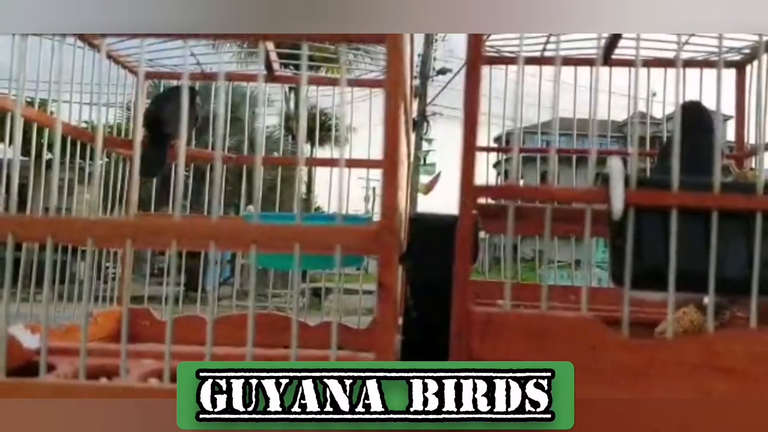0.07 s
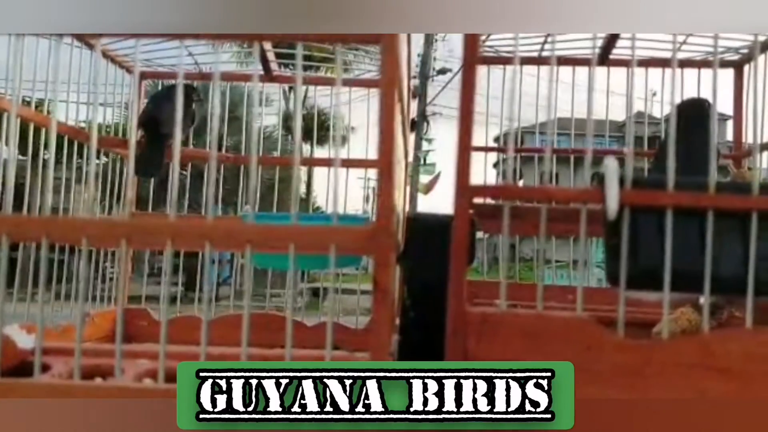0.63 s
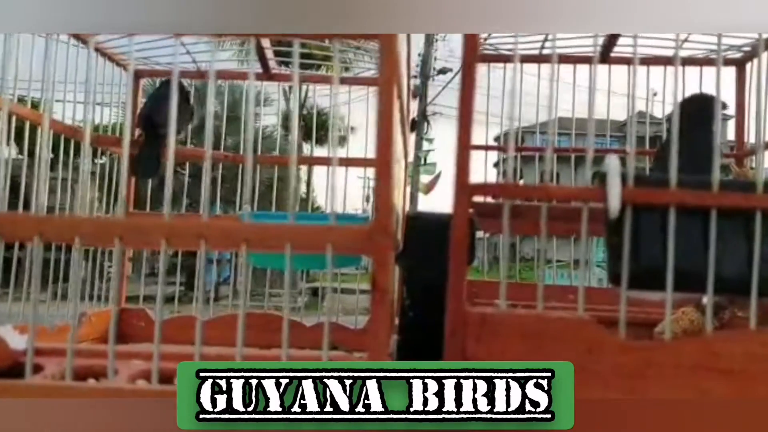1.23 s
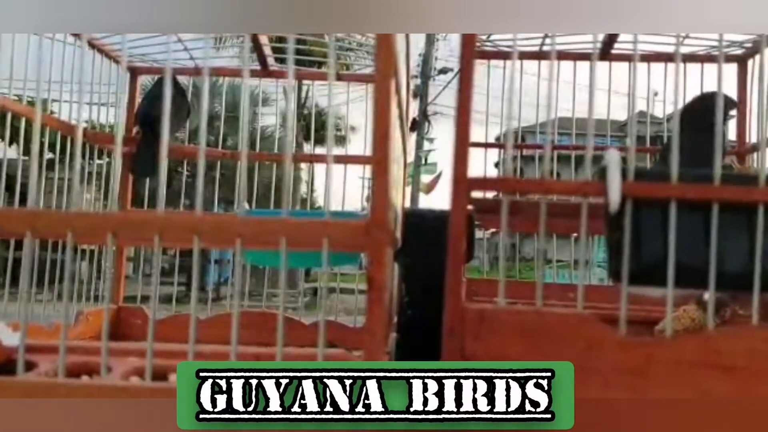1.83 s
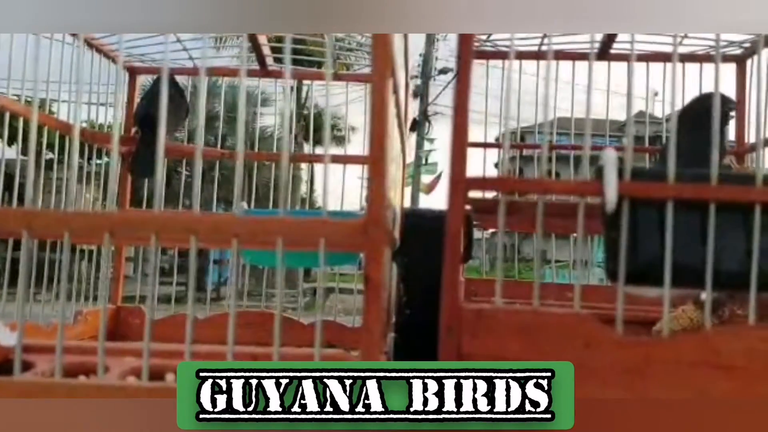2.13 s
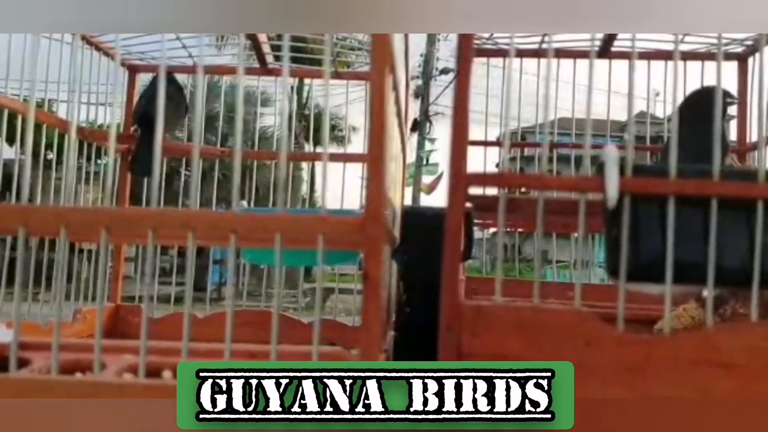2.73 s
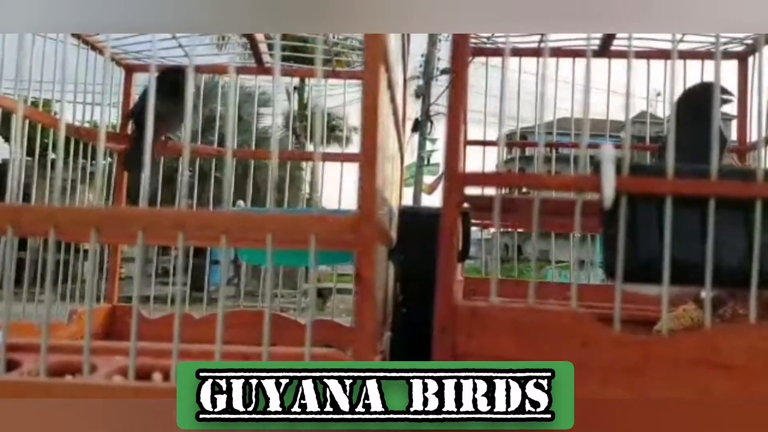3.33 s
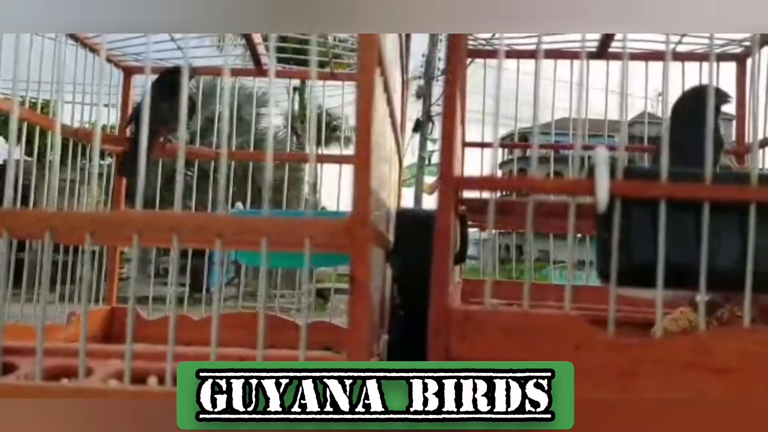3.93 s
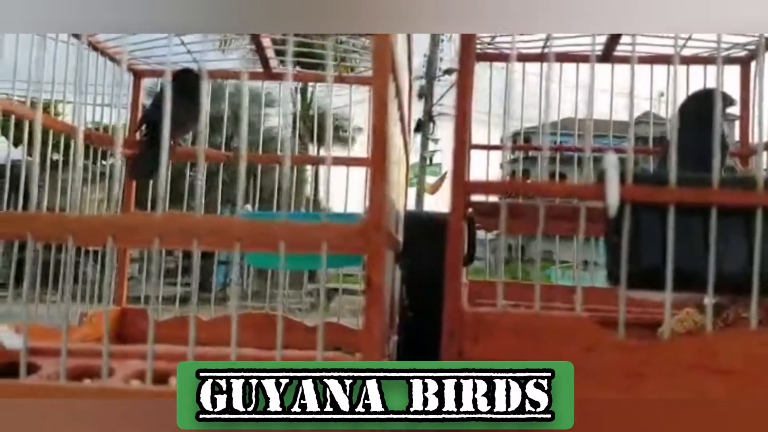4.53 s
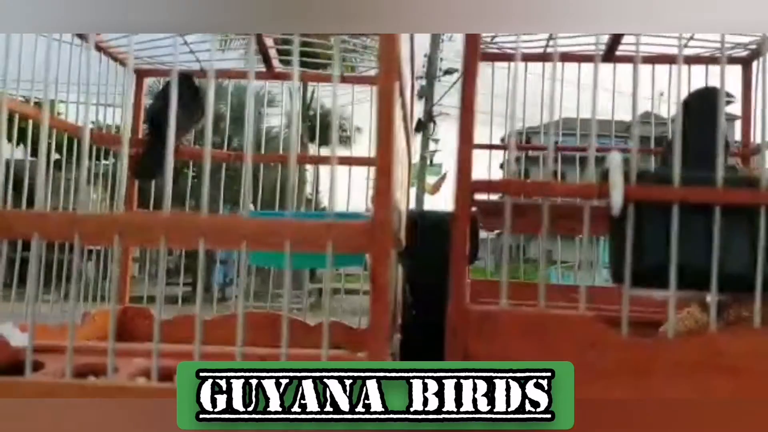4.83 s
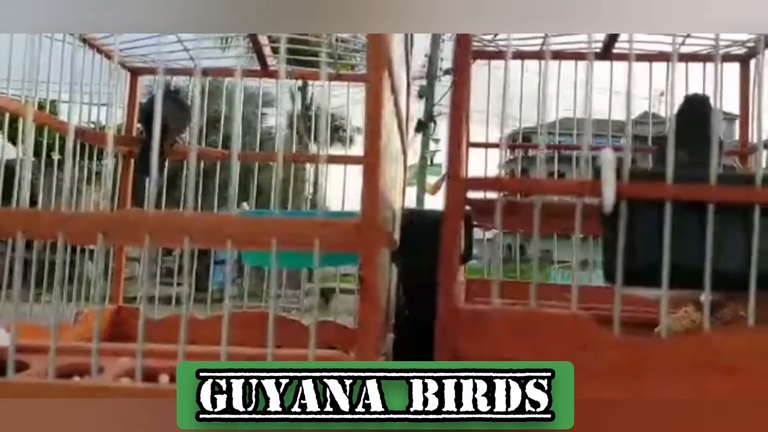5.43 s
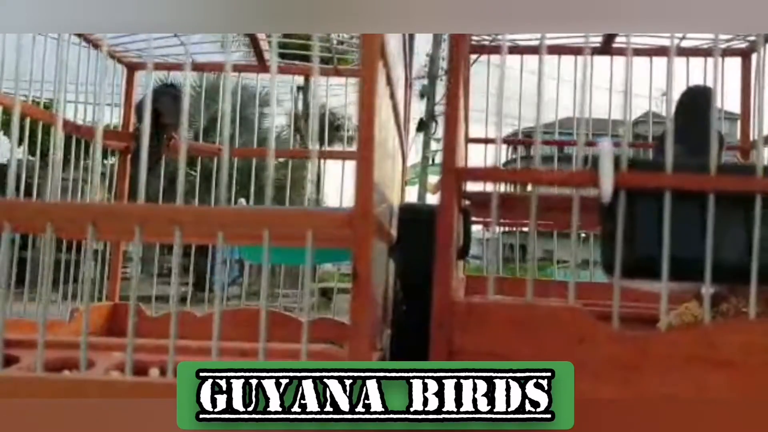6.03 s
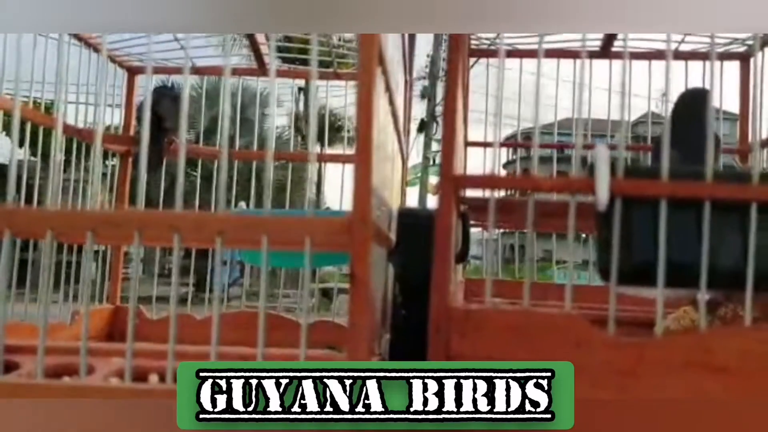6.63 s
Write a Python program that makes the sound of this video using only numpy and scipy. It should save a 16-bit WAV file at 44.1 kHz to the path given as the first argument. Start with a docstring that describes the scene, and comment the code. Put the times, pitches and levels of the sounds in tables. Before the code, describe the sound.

A caged finch sings outdoors, close to the microphone and to the right. Its quick chirps and gliding whistles start softly and grow into rapid phrases. Around the middle come a few low nasal notes, a brief hissing buzz and a short trill, then the whistled phrases resume. Other birds call faintly further off, over the low hum and tyre noise of distant traffic.

```python
"""A caged finch sings outdoors, close by and to the right: quick flicks, gliding whistles, a few
low nasal notes, a hissing buzz and a short trill. Its voice box (the syrinx) makes a tone with
overtones, and its throat and beak boost some pitches more than others. Other birds call further
off, over the low hum, tyre noise and engine drones of distant traffic.
The cage and nearby walls add short echoes."""
import sys
import numpy as np
from scipy import signal
from scipy.fft import rfft, irfft
from scipy.io import wavfile
from scipy.ndimage import uniform_filter1d

SR = 44100
rng = np.random.default_rng(int(sys.argv[2]) if len(sys.argv) > 2 else 0)


def waveform_to_disk(signal):
    """Save audio, clipped to [-1, 1], as 16-bit WAV at the path in sys.argv[1]."""
    frames = np.transpose(np.atleast_2d(signal))
    scaled = np.clip(frames, -1, 1) * 32767
    samples = np.round(scaled).astype(np.int16)
    wavfile.write(sys.argv[1], SR, samples)


N = 294147
TIME = np.arange(N) / SR
FREQS = np.maximum(np.arange(N // 2 + 1) * SR / N, 1)

# Levels in all tables are relative: later steps turn them up or down.
# The overtones of a clear whistle. Each row: multiple of the pitch, level in dB.
WHISTLE_OVERTONES = [(1, 10), (2, -7), (3, -9), (4, -19.5), (5, -32)]
# A whistle is loudest where the throat rings along. Each row: pitch in Hz, gain in dB.
WHISTLE_LOUDNESS = [(2400, -22.5), (2800, -1.5), (3300, 1), (4100, 2.5), (4600, -1.5), (4850, 0),
                    (5200, -10.5), (5600, -22), (6800, -18)]


def from_db(db):
    """Turn decibels into a factor to multiply by."""
    return 10 ** (np.asarray(db) / 20)


def rms_one(x):
    """Scale a signal to an average (rms) level of 1."""
    return x / np.sqrt(np.mean(x ** 2) + 1e-20)


def at_hz(points, hz):
    """Read between the rows of a frequency table, giving each octave equal room."""
    f, value = np.transpose(points)
    return np.interp(np.log(hz), np.log(np.sort(f)), value)


def columns(rows):
    """The columns of a table, in time order."""
    rows = np.array(rows, float)
    return rows[np.argsort(rows[:, 0], kind="stable")].T


def flutter(rate_hz):
    """A random wobble of size about 1, mostly slower than the given rate."""
    return rms_one(irfft(rfft(rng.standard_normal(N)) / (1 + (FREQS / rate_hz) ** 2), N))


def note(start, length, attack_s, release_s):
    """The samples of a note, its progress from 0 to 1, and an envelope that fades it in and out."""
    at = np.flatnonzero((TIME > start) & (TIME < start + length))
    age = TIME[at] - start
    return at, age / length, np.clip(np.minimum(age / attack_s, (length - age) / release_s), 0, 1)


def outdoor_noise(spectrum):
    """Noise from all around, nearly the same on both sides only in the bass."""
    # Each row: frequency in Hz, how alike left and right are (1 the same, -1 opposite).
    likeness = [(60, 0.97), (160, 0.94), (350, 0.67), (700, 0.0032), (1400, -0.63), (2800, 0.52),
                (6000, -0.045)]
    mid, side = rfft(rng.standard_normal((2, N))) * from_db(at_hz(spectrum, FREQS))
    alike = np.clip(at_hz(likeness, FREQS), -1, 1)
    mid, side = irfft(mid * np.sqrt(1 + alike), N), irfft(side * np.sqrt(1 - alike), N)
    return np.array([mid + side, mid - side]) / np.std(mid)


def street(road_gain_db, air_gain_db, evenness):
    """Distant traffic: a wavering engine hum, tyre noise and a faint airy hiss."""
    # The tone colours of hum, tyres and hiss. Each row: frequency in Hz, level in dB.
    hum_colour = [(22, -48), (36, -34), (48, -6), (65, -5.5), (80, 1.5), (98, 1), (120, -10.5), (170, -24),
                  (300, -43)]
    road_colour = [(60, -8), (130, 4.5), (180, -0.5), (240, 3), (330, -5.5), (490, -10.5), (700, -4.5),
                   (950, -17), (2000, -18.5)]
    air_colour = [(400, 9), (900, 4), (1400, 7), (2100, 5), (3500, 0), (5500, 0.5), (7500, -5), (10000, -3),
                  (12500, -12), (15000, -20.5)]
    # The hum swells and sinks. Each row: time in seconds, level in dB.
    hum_levels = [(0.0, -44), (0.75, -43.5), (0.93, -38), (1.25, -46), (2.25, -42.5), (2.64, -51.5),
                  (2.85, -37.5), (3.28, -46.5), (3.67, -50), (4.63, -47), (4.82, -54.5), (5.03, -39),
                  (5.27, -52.5), (5.69, -49.5), (6.1, -40), (6.45, -45.5)]
    # Each row: time in seconds, tyre level in dB, hiss level in dB.
    noise_levels = [(0.0, -48.5, -61.5), (0.9, -48.5, -59), (1.8, -53.5, -67.5), (2.9, -55.5, -63.5),
                    (3.6, -57.5, -61.5), (4.5, -56, -60.5), (5.4, -51, -58), (6.2, -47.5, -56),
                    (6.65, -44.5, -54.5)]
    times, *levels = columns(noise_levels)
    road, air = [from_db(np.interp(TIME, times, level)) for level in levels]
    drone = outdoor_noise(hum_colour)
    # an engine holds its level more evenly than plain noise does
    drone /= uniform_filter1d(np.mean(drone ** 2, axis=0), size=3000) ** evenness
    hum = from_db(np.interp(TIME, *columns(hum_levels))) * drone
    tyres = from_db(road_gain_db) * road * outdoor_noise(road_colour)
    rumble = signal.sosfilt(signal.butter(2, 1500, fs=SR, output="sos"), hum + tyres)
    return rumble + from_db(air_gain_db) * air * outdoor_noise(air_colour)


def engines(waver_db, fade_s):
    """Far engines drone as they slowly gain or lose speed."""
    # Each row: start and length in seconds, first and last firing rate in Hz, level in dB.
    drones = [(-.3, 2.3, 67.33, 61.47, -45.5), (1.801, 1.034, 71.17, 86.67, -44.5),
              (3.001, 3.3, 57, 45.1, -58), (5.75, 0.56, 87, 69.8, -45)]
    # Levels in dB of the firing rate and its next three multiples.
    harmonics_db = [1.5, -13.5, -18, -27.5]
    out = np.zeros(N)
    wander = 1 + 0.0117 * flutter(rate_hz=2.4)
    for start, length, first, last, db in drones:
        at, progress, envelope = note(start, length, fade_s, fade_s)
        phase = 2 * np.pi * np.cumsum((first + (last - first) * progress) * wander[at]) / SR
        for k, harmonic_db in enumerate(harmonics_db, 1):
            out[at] += envelope * from_db(db + harmonic_db) * np.sin(k * phase)
    return out * from_db(waver_db * flutter(rate_hz=4.5))


def far_whistles(swell_share, fade_share, flicker_db):
    """Far birds slide in pitch; distance strips the overtones and makes the level flicker."""
    # Each row: start and length in seconds, first and last pitch in Hz,
    # settling (over 0 the slide slows down, under 0 it speeds up), level in dB.
    slides = [(-.05, 0.21, 3820, 3520, -2.5, -59.5), (.51, 0.12, 4620, 4880, -0.5, -51),
              (.56, 0.27, 8100, 4520, 5.5, -44), (0.646, 0.066, 4500, 4040, 1, -49.5),
              (.77, 0.07, 4700, 5450, -.3, -45), (1.632, .28, 3100, 4010, -1, -55),
              (2.825, .09, 4973, 4500, 3.5, -46), (3.509, 0.065, 4660, 5070, -0.5, -45.5),
              (3.99, 0.15, 4980, 4080, 7.5, -50), (5.06, 0.048, 4903, 4490, 1, -45),
              (5.879, 0.087, 5800, 4950, 2.5, -48.5)]
    out = np.zeros(N)
    for start, length, first, last, settling, db in slides:
        at, progress, envelope = note(start, length, swell_share * length, fade_share * length)
        pitch = first + (last - first) * np.expm1(-settling * progress) / np.expm1(-settling)
        out[at] += from_db(db) * envelope * np.sin(2 * np.pi * np.cumsum(pitch) / SR)
    return out * from_db(flicker_db * flutter(rate_hz=72))


def far_chips(start_hz, toward_hz, length_s):
    """A far bird's thin chips sweep up and level off, a little higher or lower every time."""
    # Each row: start in seconds, level in dB.
    chips = [(0.005, -40.5), (0.05, -47), (0.122, -44.5), (0.229, -43.5), (0.831, -44), (0.95, -37.5),
             (0.998, -42), (1.061, -43), (1.106, -43), (1.138, -45), (3.65, -46.5), (3.778, -44.5),
             (3.84, -49)]
    out = np.zeros(N)
    for (start, db), detune in zip(chips, rng.normal(1, 0.0136, len(chips))):
        at = np.flatnonzero((TIME >= start) & (TIME < start + length_s))
        progress = (TIME[at] - start) / length_s
        pitch = detune * (start_hz + (toward_hz - start_hz) * np.sin(1.247 * progress))
        out[at] += from_db(db) * np.sin(np.pi * progress) * np.sin(2 * np.pi * np.cumsum(pitch) / SR)
    return out


def reflections(x, delay_s, ring_s, dull_hz):
    """Many small echoes, different on each side, that die away by 60 dB in ring_s."""
    age = TIME[:SR // 2] - delay_s
    echoes = rng.standard_normal((2, len(age))) * (age > 0) * from_db(-60 * np.abs(age) / ring_s)
    echoes /= np.sqrt(np.sum(echoes ** 2, axis=1, keepdims=True))
    dull = signal.sosfilt(signal.butter(1, dull_hz, fs=SR, output="sos"), x)
    return signal.fftconvolve(dull[None], echoes, axes=1)[:, :N]


def from_the_right(x, lag_ms):
    """The left side is shaded from the finch and hears it later."""
    # Each row: frequency in Hz, left level minus right level in dB.
    shade = [(1500, -9.5), (2550, -1.5), (2690, -48), (2830, -14), (3050, -3), (3300, -8.5), (3520, -4.5),
             (3700, -10.5), (3930, -14.5), (4250, -24.5), (4600, -22), (6000, -9.5), (9000, -13),
             (13000, -16)]
    left = from_db(at_hz(shade, FREQS)) * np.exp(-2j * np.pi * FREQS * lag_ms / 1000)
    return np.array([irfft(rfft(x) * left, N), x])


def rasp():
    """Air swirling through the voice box makes the hiss of a strained voice."""
    # Each row: frequency in Hz, level in dB.
    colour = [(1500, -46), (2800, -22.5), (4500, 8.5), (6500, 0), (8500, 1.5), (10500, -7), (13000, 8.5),
              (15000, -14)]
    return rms_one(irfft(rfft(rng.standard_normal(N)) * from_db(at_hz(colour, FREQS)), N))


def syrinx(pitch, overtones, jitter, richness=1):
    """The voice box's tone through the throat, and its strength; jitter shakes the pitch."""
    # How throat and beak boost or weaken the sound. Each row: frequency in Hz, gain in dB.
    throat = [(1200, -48), (2000, -25), (2500, -10), (3000, -3), (4200, 5.5), (5000, -1), (6000, -15.5),
              (7500, -20), (10000, -8.5), (13500, 2), (15000, -11.5)]
    pitch = np.maximum(pitch, 500)
    phase = 2 * np.pi * np.cumsum(pitch * (1 + jitter * flutter(rate_hz=960))) / SR
    tone, power = 0, 1e-12
    for k, db in overtones:
        gain = from_db(db + at_hz(throat, k * pitch)) * (k * pitch < SR / 2)
        gain *= richness if k > 1 else 1
        tone += gain * np.sin(k * phase)
        power += gain ** 2
    return tone, np.sqrt(power)


def phrase(sung, loudness):
    """Join notes, each (samples, pitch, amplitude), into one melody; overlapping notes blend."""
    weighted, weight, amplitude = np.zeros((3, N))
    for at, hz, height in sung:
        weighted[at] += hz * height
        weight[at] += height
        amplitude[at] = np.maximum(amplitude[at], height)
    voiced = amplitude > 0
    pitch = uniform_filter1d(np.interp(TIME, TIME[voiced], weighted[voiced] / weight[voiced]), size=45)
    return pitch, uniform_filter1d(amplitude, size=45) * from_db(at_hz(loudness, pitch))


def sing(sung, loudness, overtones, jitter, sweep_jitter, full_db, strain_hz, rasp_db):
    """The voice is richer when loud and rough in fast sweeps; high up, overtones give way to rasp."""
    pitch, amplitude = phrase(sung, loudness)
    wobble = flutter(rate_hz=46.24)   # a held note is slightly unsteady
    pitch *= 1 + 0.00414 * wobble
    amplitude *= from_db(1.5 * wobble)
    octaves_per_s = uniform_filter1d(np.abs(np.gradient(np.log2(pitch))) * SR, size=300)
    roughness = jitter + sweep_jitter * np.tanh(octaves_per_s / 50)
    strain = 1 / (1 + (strain_hz / pitch) ** 16)
    richness = (1 - strain) * (np.abs(amplitude) / from_db(full_db)) ** 0.31
    tone, strength = syrinx(pitch, overtones, roughness, richness)
    push = uniform_filter1d(amplitude * strain, size=1500) * np.tanh(amplitude / from_db(-61))
    return amplitude * tone / strength + from_db(rasp_db) * push * rasp()


def swings(rows, base_hz, edge_s):
    """The voice box tenses and relaxes once per note, so the pitch rises to a peak and falls."""
    for start, length, to_top, top, rise, fall, db in rows:
        at, progress, envelope = note(start, length, edge_s, edge_s)
        past_top = progress * length - to_top
        width = np.where(past_top < 0, rise, fall)
        yield at, base_hz + (top - base_hz) / (1 + (past_top / width) ** 2), from_db(db) * envelope


def ticks(decay_s):
    """Tiny bright snaps near the start of some flicks."""
    # Each row: start in seconds, level in dB.
    snaps = [(0.499, -36.5), (2.8, -23.5), (4.408, -41)]
    envelope = sum(from_db(db) * (TIME >= s) * np.exp(-np.abs(TIME - s) / decay_s) for s, db in snaps)
    bursts = envelope * rng.standard_normal(N)
    return signal.sosfilt(signal.butter(2, 4000, "high", fs=SR, output="sos"), bursts)


def undertones():
    """The other side of the voice box adds a soft low chirp just before some slurs."""
    # Each row: start and length in seconds, first and last pitch in Hz, level in dB.
    chirps = [(0.964, 0.0243, 2390, 2910, -27), (4.887, 0.043, 2450, 2716, -18.5),
              (5.098, 0.022, 2980, 2828, -34.5)]
    sung = []
    for start, length, first, last, db in chirps:
        at, progress, envelope = note(start, length, length / 2, length / 2)
        sung.append((at, last + (first - last) * (1 - progress) ** 2, from_db(db) * envelope))
    return sing(sung, WHISTLE_LOUDNESS, WHISTLE_OVERTONES, jitter=0.024, sweep_jitter=.02,
                full_db=-41.5, strain_hz=3240, rasp_db=-3)


def nasal_notes(sag_share, sag_s):
    """Low reedy notes whose pitch sags at both ends, while the bird's air pressure builds and drops."""
    # Each row: start, length and time to the top in seconds, top pitch before the sag in Hz,
    # seconds from halfway up to the top, seconds from the top to halfway down, level in dB.
    calls = [(2.626, 0.045, 0.028, 2534, 0.025, 0.0245, -17.5), (2.946, .252, .155, 3002, 0.099, .045, -15),
             (3.591, .203, .151, 2336, .055, .02, -20), (6.468, .04, 0.019, 2440, 0.013, 0.022, -14.5)]
    # Strong overtones. Each row: multiple of the pitch, level in dB.
    reedy = [(1, 17), (2, -1.5), (3, -12), (4, -19.5), (5, -25.5)]
    # The throat favours the higher notes. Each row: pitch in Hz, gain in dB.
    loudness = [(1300, -14), (1550, -11), (1900, -12), (2300, -12), (2700, -6), (3000, -1)]
    sung = []
    for at, hz, height in swings(calls, base_hz=1231, edge_s=0.0034):
        from_edge_s = np.minimum(at - at[0], at[-1] - at) / SR
        sung.append((at, hz * (1 - sag_share * np.exp(-from_edge_s / sag_s)), height))
    return sing(sung, loudness, reedy, jitter=0.0059, sweep_jitter=0.049,
                full_db=-34, strain_hz=2797, rasp_db=-31)


def buzz(swings_hz, top_s, jitter, rasp_db, pulse_db):
    """A harsh tone swings fast through the throat's ringing range and clears as the swings shrink."""
    # Each row: time in seconds, lowest pitch in Hz, pitch swing in Hz, level in dB.
    course = [(3.29, 3000, 1018, -38.5), (3.325, 3050, 1129, -34), (3.352, 2830, 1555, -30.5),
              (3.38, 2650, 1230, -33.5), (3.405, 2500, 1578, -33.5), (3.425, 2600, 1798, -28),
              (3.446, 2750, 794, -31.5), (3.472, 2824, 566, -28), (3.525, 2830, 154, -29)]
    # The overtones. Each row: multiple of the pitch, level in dB.
    harsh = [(1, 4.5), (2, 12), (3, -13), (4, -14), (5, -9)]
    times, low, swing, level_db = columns(course)
    at, _, envelope = note(times[0], times[-1] - times[0], attack_s=0.0026, release_s=0.011)
    amplitude = np.interp(TIME, TIME[at], envelope, left=0, right=0)
    amplitude *= from_db(np.interp(TIME, times, level_db))
    dip = np.abs(np.sin(np.pi * swings_hz * (TIME - top_s)))
    depth = np.interp(TIME, times, swing)
    pitch = np.interp(TIME, times, low) + depth * (1 - dip ** 1.5)
    strain = np.sqrt(depth / swing.max())
    pulse = from_db(pulse_db * strain * (1 - dip))   # a push at the top of each swing
    tone, _ = syrinx(pitch, harsh, jitter * strain)
    return amplitude * (pulse * tone + from_db(rasp_db) * strain * rasp())


def trill(low_hz, span_hz, swings_hz, top_s, jitter, rasp_db, pulse_db):
    """About five swings grow louder; each swells as it rises into the throat's ringing range."""
    # One swing, a quick drop and a slower rise. Each row: share of the cycle, height from 0 to 1.
    shape = [(0, 1), (.08, .8), (.2, .2), (.36, 0), (.55, .08), (.72, .36), (.9, .85), (1, 1)]
    # The overtones. Each row: multiple of the pitch, level in dB.
    bright = [(1, -2.5), (2, -7.5), (3, -28), (4, -24), (5, -39)]
    at, _, envelope = note(start=3.873, length=0.2165, attack_s=0.087, release_s=0.023)
    amplitude = from_db(-17.5) * np.interp(TIME, TIME[at], envelope, left=0, right=0)
    cycle = swings_hz * (TIME - top_s) % 1
    lift = uniform_filter1d(np.interp(cycle, *np.transpose(shape)), size=100)
    pulse = from_db(pulse_db * lift ** 4)   # a push at the top of each swing
    tone, _ = syrinx(low_hz + span_hz * lift, bright, jitter)
    return amplitude * (pulse * tone + from_db(rasp_db) * rasp())


def whips():
    """The pitch holds, then shoots up out of the throat's ringing range and into a slur."""
    # Each row: start and length in seconds, first and top pitch in Hz, level in dB.
    rows = [(1.297, 0.013, 3360, 4840, -15.5), (2.127, 0.032, 4497, 6870, -13),
            (2.376, .031, 4450, 6794, -12.5), (5.962, 0.042, 4026, 6350, -23.5),
            (6.199, 0.038, 4290, 6670, -18.5)]
    for start, length, first, top, db in rows:
        at, progress, envelope = note(start, length, attack_s=0.015, release_s=0.0051)
        yield at, first + (top - first) * progress ** 4.9, from_db(db) * envelope


def flicks():
    """Very short whistles, each one quick swing up and down."""
    # Each row: start, length and time to the top in seconds, top pitch in Hz,
    # seconds from halfway up to the top, seconds from the top to halfway down, level in dB.
    rows = [(.49, 0.02073, 0.0083, 5269, .009, .012, -26), (.934, 0.027, 0.0091, 4734, .007, .0065, -27.5),
            (1.162, 0.032, 0.01023, 4257, .0065, .0098, -22),
            (2.672, 0.031, 0.016, 6655, .0087, .0095, -19.5),
            (2.796, 0.029, 0.01157, 6114, .008, .0095, -18), (4.144, 0.0356, 0.013, 5727, 0.01, .013, -22),
            (4.393, 0.027, 0.00887, 5577, .007, .0125, -20.5),
            (4.627, .033, .0088, 5700, 0.00663, .012, -26),
            (4.868, 0.026, .0084, 4454, .0069, .0068, -20.5),
            (6.515, 0.0295, 0.014, 6300, .0086, .0077, -22), (6.641, 0.026, 0.011, 5470, .0077, .0098, -19)]
    return swings(rows, base_hz=2650, edge_s=0.0051)


def wavers(period_s, settling):
    """The pitch rocks up and down, less each time."""
    # Each row: start and length in seconds, middle pitch and swing in Hz,
    # seconds to the first crest, level in dB.
    rows = [(1.472, 0.13, 3210, 178.4, .021, -18), (5.447, .153, 2892, 169, .028, -21.5)]
    for start, length, middle, swing, crest, db in rows:
        at, progress, envelope = note(start, length, attack_s=0.028, release_s=0.028)
        turns = (progress * length - crest) / period_s
        rocking = np.cos(2 * np.pi * turns) * np.exp(-(settling * turns) ** 4)
        yield at, middle + swing * rocking, from_db(db) * envelope


def arches():
    """Whistles that rise, hold and droop while their level swells and sinks."""
    # Each row: start and length in seconds, first, top and last pitch in Hz,
    # share of the note spent rising, level in dB.
    rows = [(0.288, 0.13, 3457, 3856, 3230, 0.433, -26.5), (0.516, 0.12, 3418, 3810, 2898, 0.61, -21),
            (0.737, 0.13, 2925, 3180, 2971, 0.543, -19), (2.7, 0.071, 3390, 3495, 2402, 0.37, -15),
            (2.823, 0.066, 3331, 3450, 2132, 0.33, -14.8), (4.188, 0.15, 3026, 3359, 2646, 0.42, -12.5),
            (4.428, 0.143, 2778, 3362, 2570, 0.423, -13), (4.666, 0.15, 2613, 2834, 2651, 0.415, -13),
            (6.543, 0.078, 3198, 3326, 2186, 0.25, -15.5)]
    for start, length, first, top, last, share, db in rows:
        at, progress, _ = note(start, length, length, length)
        rise = np.maximum(1 - progress / share, 0) ** 2
        droop = (np.maximum(progress - share, 0) / (1 - share)) ** 2.3
        pitch = top + (first - top) * rise + (last - top) * droop
        yield at, pitch, from_db(db) * np.sin(np.pi * progress) ** 0.58


def slurs():
    """Whistles that slide onto a held pitch and curl off at the end."""
    # Each row: start and length in seconds, first, held and last pitch in Hz, share of the note spent
    # sliding, bend (under 1 plunges at once, over 1 lingers first), first and last level in dB.
    rows = [(0.983, .11, 4776, 3670, 3520, 0.74, 1.08, -15.5, -19),
            (1.198, 0.12, 4959, 3320, 3320, 0.83, 1.07, -13.5, -16.5),
            (1.303, 0.073, 4950, 3860, 3840, 0.79, 1.58, -9.5, -18),
            (1.69, 0.15, 2635, 3067, 2780, 0.96, 2.03, -23.5, -13),
            (1.899, 0.17, 3956, 3138, 3500, .88, 1.95, -17.5, -11.5),
            (2.161, 0.16, 7350, 3390, 3720, .84, 0.47, -14, -15),
            (2.409, 0.16, 7718, 3430, 3610, 0.75, .495, -11.5, -16),
            (4.916, 0.11, 4697, 3458, 3524, 0.62, 1.33, -13, -15),
            (5.119, .134, 4723, 2853, 3830, .89, 1.23, -15.5, -18),
            (5.252, 0.074, 4705, 3595, 4040, 0.65, 1.3, -23.5, -16),
            (5.72, 0.17, 3806, 3037, 3090, 0.91, 1.37, -22.5, -23),
            (6.006, .151, 4964, 2988, 3850, .75, .92, -23.5, -15),
            (6.234, 0.17, 6405, 3065, 3800, 0.72, 0.77, -17.5, -18)]
    for start, length, first, held, last, share, bend, first_db, last_db in rows:
        at, progress, envelope = note(start, length, attack_s=0.011, release_s=0.022)
        slide = (1 - np.minimum(progress / share, 1) ** bend) ** 2
        curl = (np.maximum(progress - share, 0) / (1 - share)) ** 3
        pitch = held + (first - held) * slide + (last - held) * curl
        yield at, pitch, envelope * from_db(first_db + (last_db - first_db) * progress)


def whistles():
    """The finch's main song: five shapes of whistle, all in one clear voice."""
    sung = [*whips(), *flicks(), *slurs(), *arches(), *wavers(period_s=.083, settling=1.05)]
    return sing(sung, WHISTLE_LOUDNESS, WHISTLE_OVERTONES, jitter=0.00043, sweep_jitter=0.0296,
                full_db=-1.0, strain_hz=4760, rasp_db=-21)


def scene():
    """The finch in its cage, the farther birds and the street."""
    finch = whistles() + nasal_notes(sag_share=0.33, sag_s=.008) + undertones()
    finch += buzz(swings_hz=41.2, top_s=3.4, jitter=0.025, rasp_db=-10.5, pulse_db=5.5)
    finch += trill(low_hz=2468, span_hz=1396, swings_hz=21.93, top_s=3.985,
                   jitter=0.022, rasp_db=-30, pulse_db=3.5)
    finch += ticks(decay_s=0.00051)
    cage = from_db(-21) * reflections(finch, delay_s=.001, ring_s=.028, dull_hz=8000)
    walls = from_db(-31) * reflections(finch, delay_s=.012, ring_s=.4, dull_hz=5000)
    far = far_whistles(swell_share=0.29, fade_share=0.28, flicker_db=4.0)
    far = far * from_db([[-2], [-1]])   # left, right
    chips = far_chips(start_hz=4440, toward_hz=5890, length_s=0.0338)
    far_calls = chips + from_db(-2) * far[1]
    far_echoes = from_db(-1) * reflections(far_calls, delay_s=.01, ring_s=.45, dull_hz=9000)
    birds = from_the_right(finch, lag_ms=0.1568) + cage + walls + far + chips / 2 + far_echoes
    drones = engines(waver_db=3.0, fade_s=0.24)
    return birds + drones + street(road_gain_db=1.0, air_gain_db=4.5, evenness=0.072)


def record(dry):
    """The deepest bass and the highest treble are cut."""
    dry = signal.sosfilt(signal.butter(2, 20, "high", fs=SR, output="sos"), dry)
    return signal.sosfilt(signal.cheby1(14, .1, 14750, fs=SR, output="sos"), dry)


dry = scene()
out = record(dry)
waveform_to_disk(out)
```